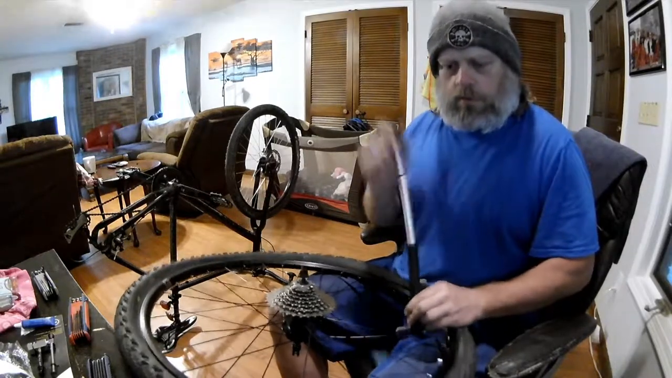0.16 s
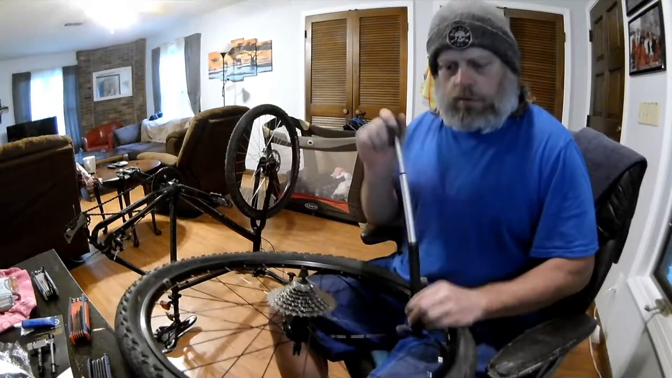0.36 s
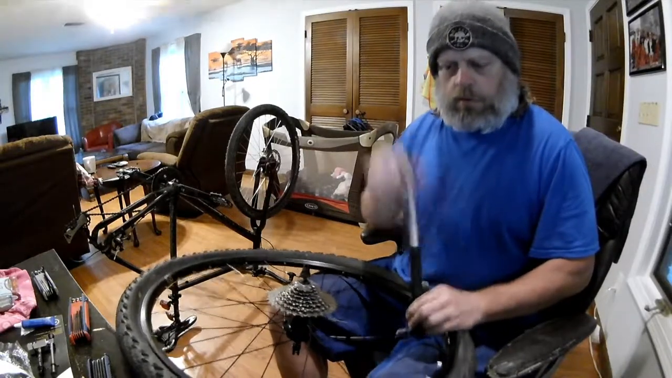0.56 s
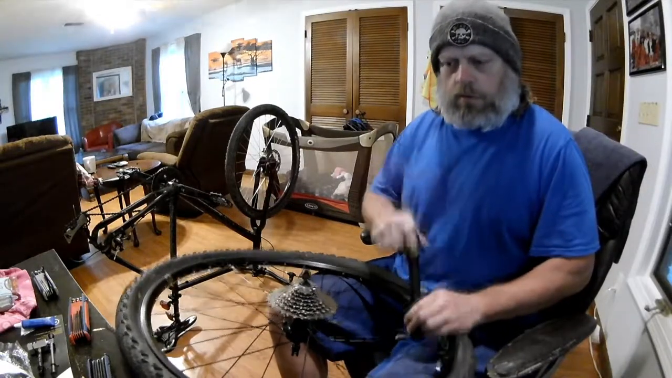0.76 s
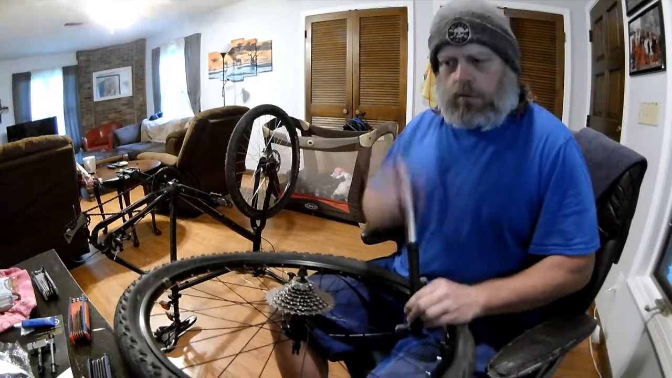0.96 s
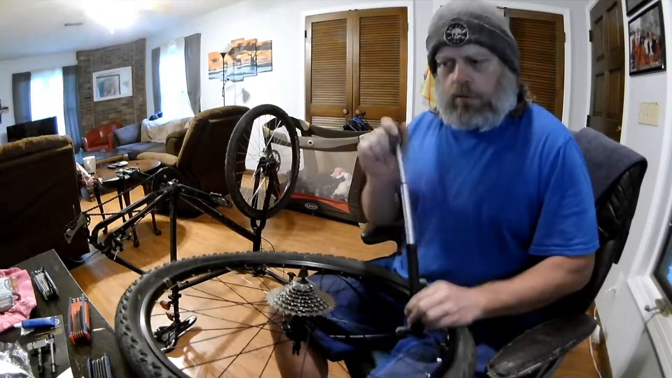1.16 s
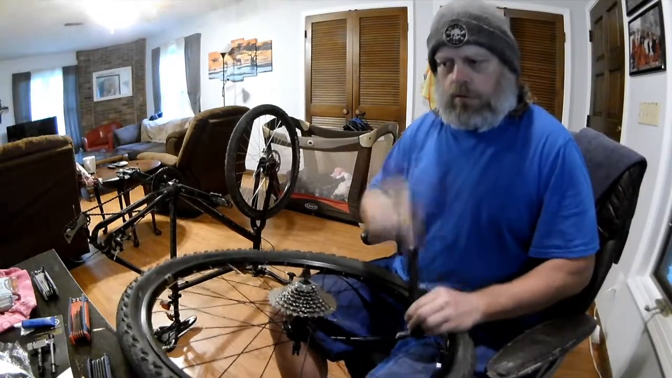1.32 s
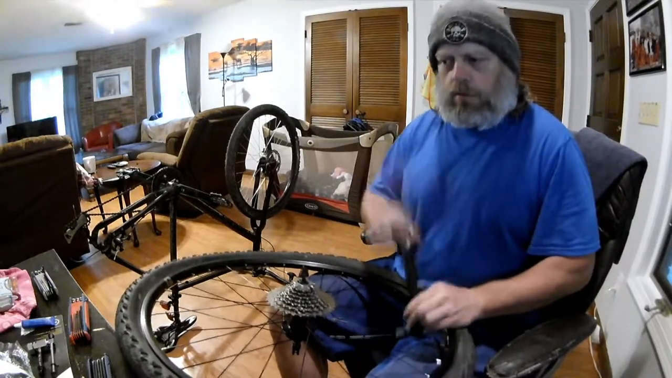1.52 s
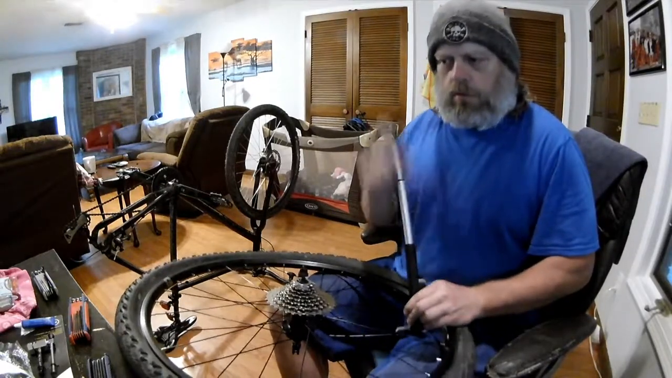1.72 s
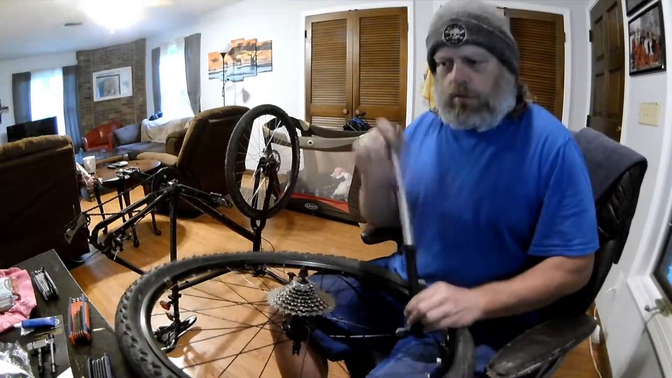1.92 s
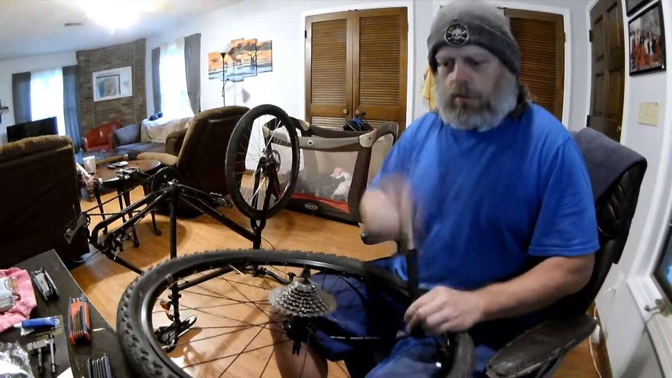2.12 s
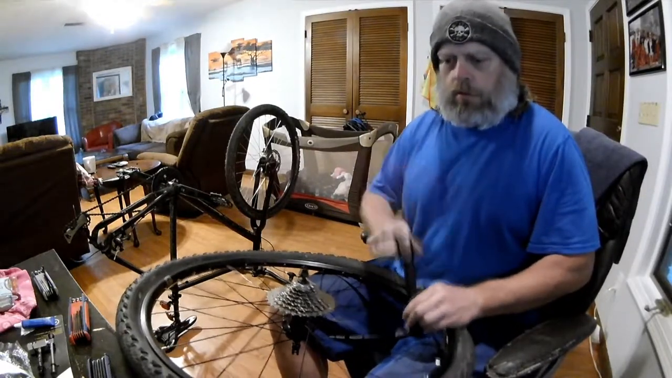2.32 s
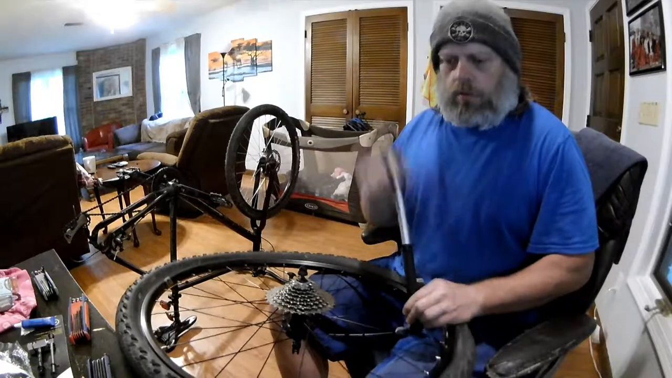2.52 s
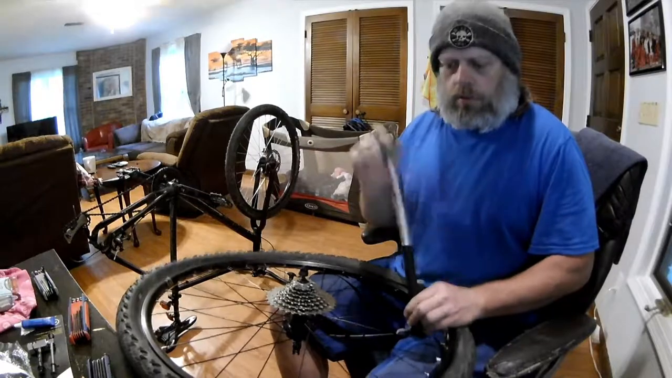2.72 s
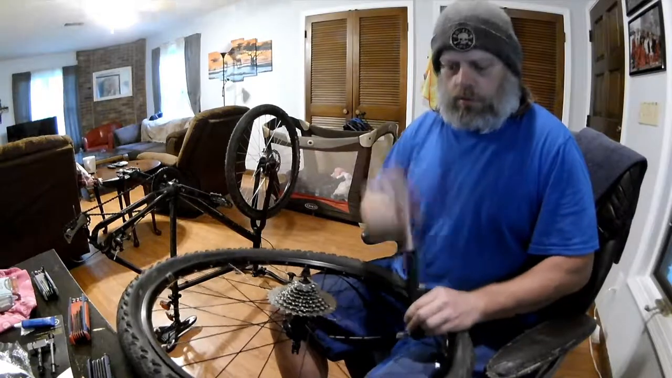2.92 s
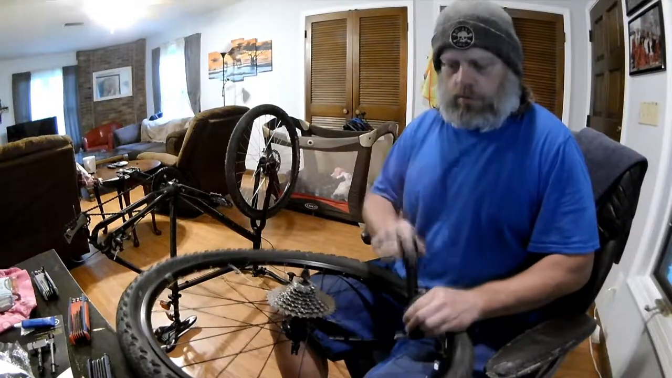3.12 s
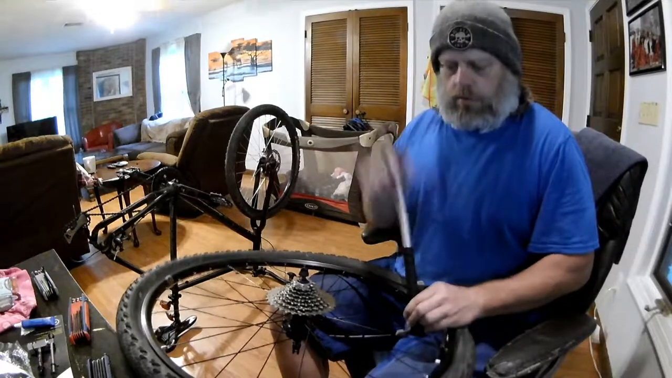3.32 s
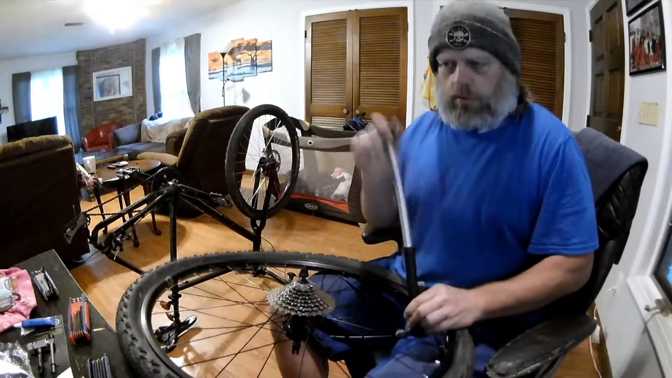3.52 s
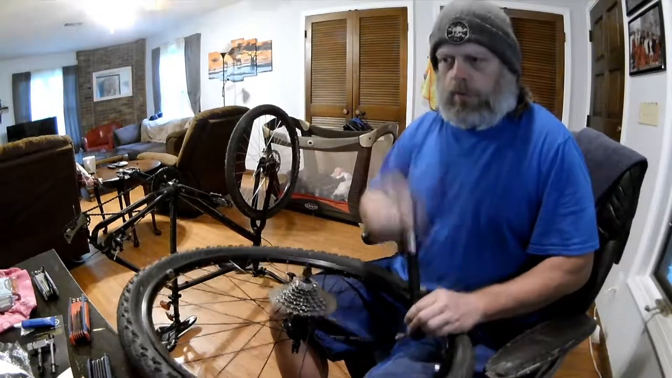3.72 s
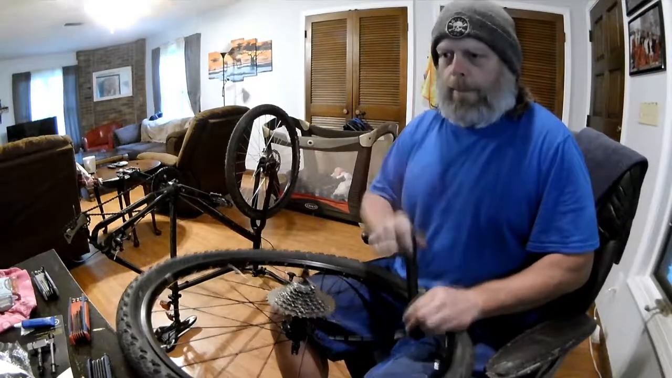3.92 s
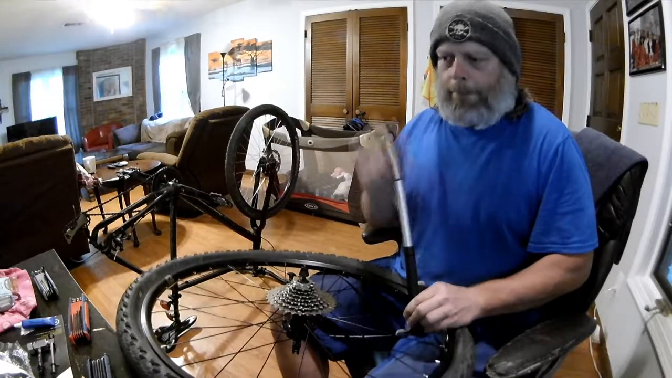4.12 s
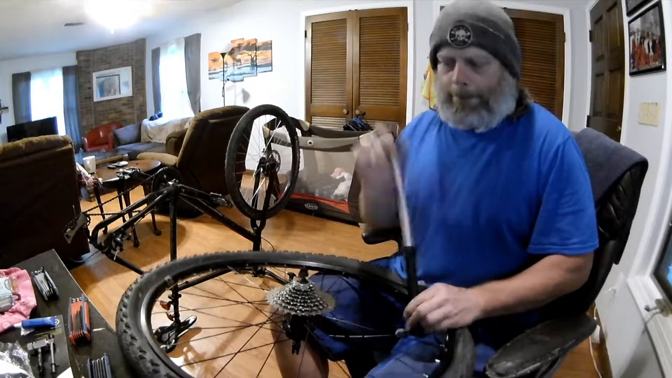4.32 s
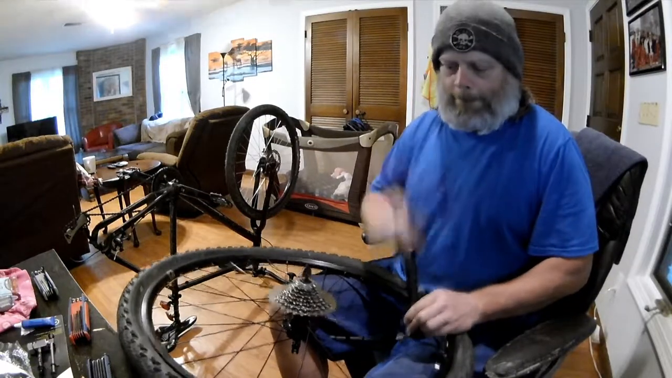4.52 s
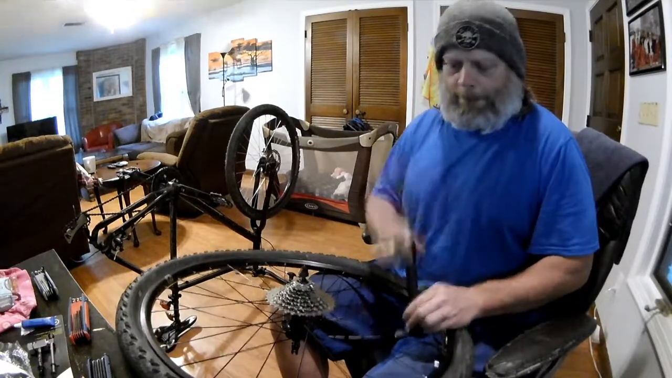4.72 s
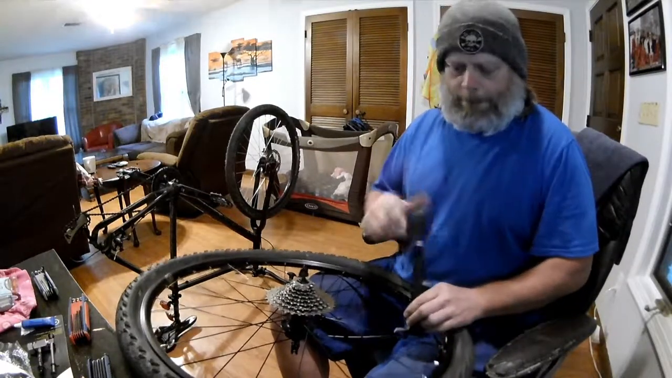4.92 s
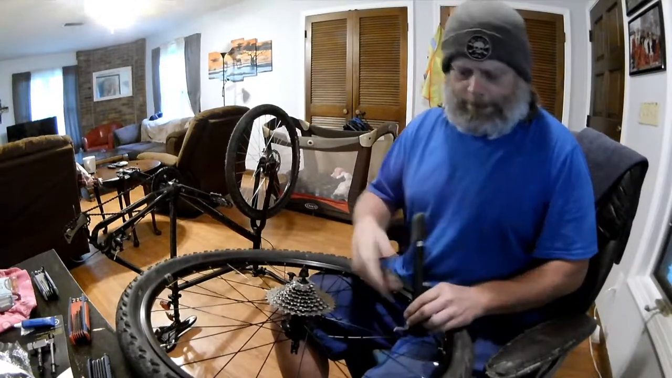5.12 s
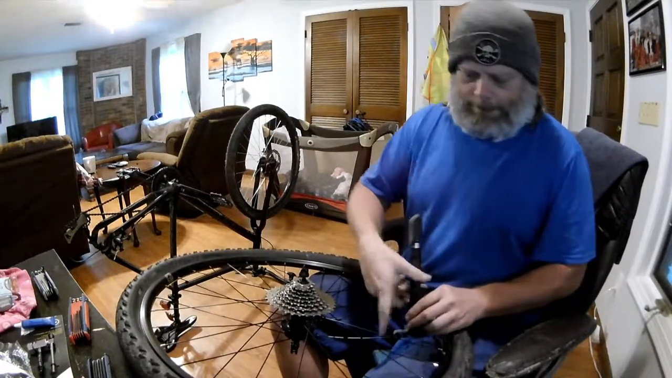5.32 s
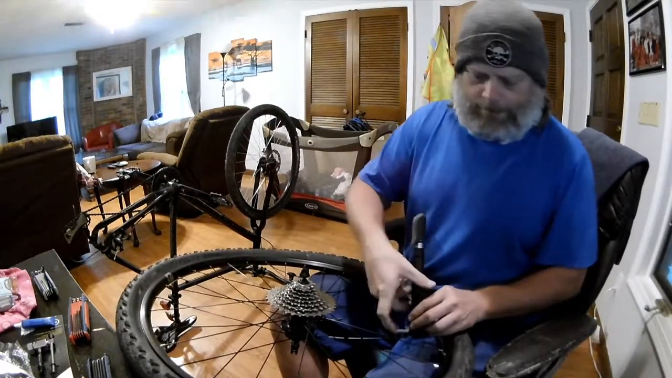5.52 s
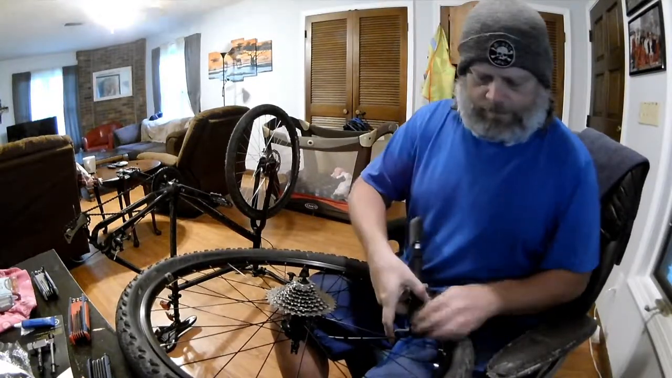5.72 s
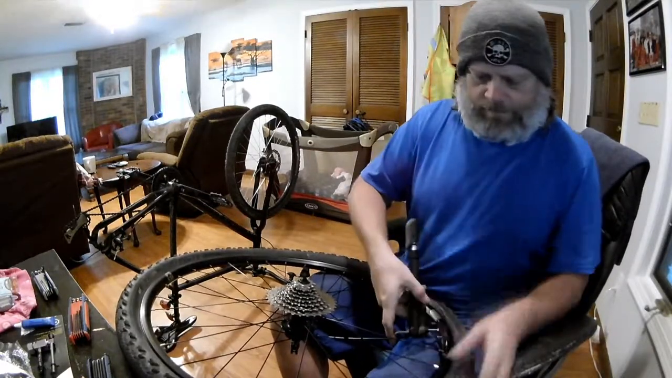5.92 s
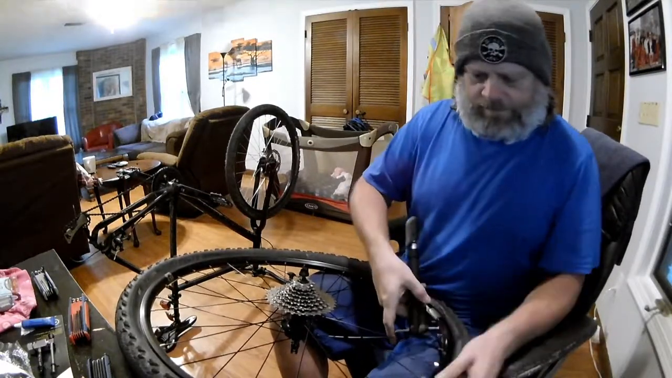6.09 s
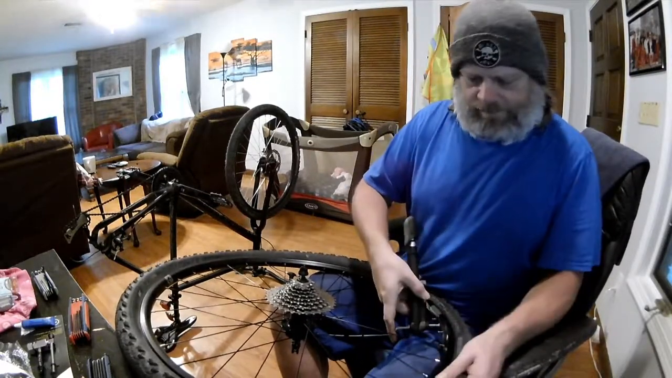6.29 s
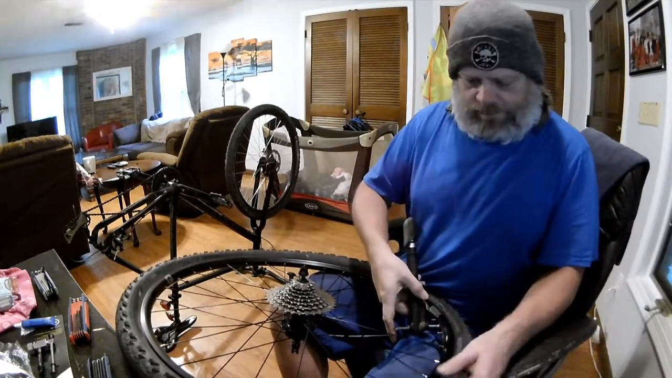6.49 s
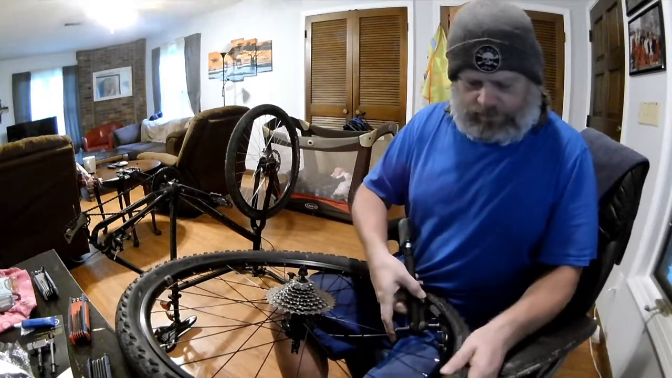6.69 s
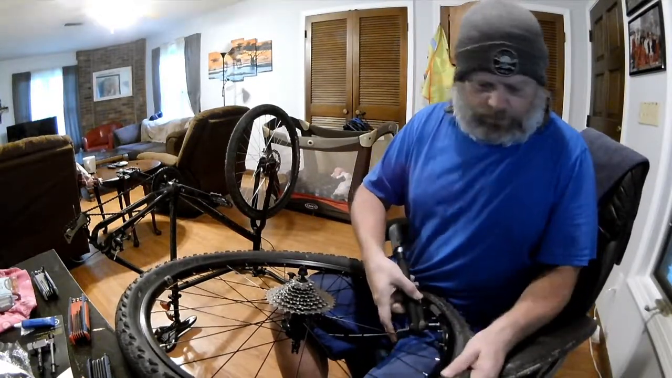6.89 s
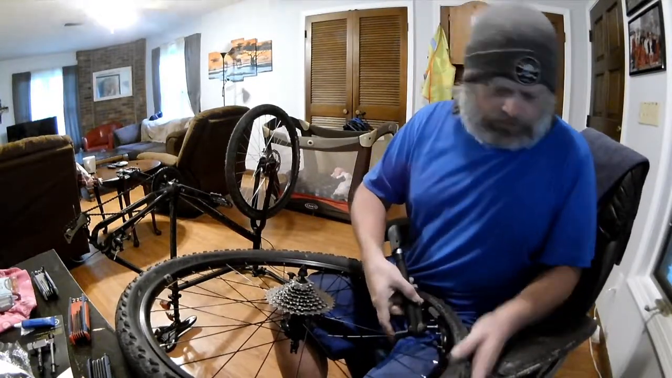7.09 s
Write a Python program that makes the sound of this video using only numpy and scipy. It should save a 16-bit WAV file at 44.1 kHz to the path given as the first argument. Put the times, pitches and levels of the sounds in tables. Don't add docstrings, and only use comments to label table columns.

```python
import sys
import numpy as np
from scipy import signal
from scipy.fft import rfft, irfft
from scipy.io import wavfile

SR = 44100
rng = np.random.default_rng(int(sys.argv[2]) if len(sys.argv) > 2 else 0)


def gain_from_db(level_db):
    decades = np.asarray(level_db, float) / 20
    return 10 ** decades


def master(y):
    cut = np.clip(np.atleast_2d(y).T, -1, 1)
    pcm = np.round(cut * 32767)
    wavfile.write(sys.argv[1], SR, pcm.astype(np.int16))


N = 315315
SIZE = 4096

# start in seconds, peak in dB, lean of the pump (0 upright, 1 tilted),
# brightness in dB per octave, level of the valve whistle in dB.
KNOCKS = [(0.1811, -6.5, 0.054, -0.3, -50), (0.4433, -6, 0.086, -0.2, -46), (0.7088, -5.5, 0.13, 0.8, -56),
          (0.977, -6, 0.27, -0.2, -47), (1.261, -10, 0.98, 1, -63), (1.5261, -11, 0.83, 0.4, -65),
          (1.7646, -5.5, 0.13, 0.4, -42), (2.0514, -10.5, 0.98, 1, -65), (2.3187, -12, 1, 1.5, -65),
          (2.589, -11.5, 1, 2, -65), (2.8525, -11.5, 1, 0.7, -65), (3.1141, -10, 0.98, 0.5, -65),
          (3.379, -10, 0.9, 0, -63), (3.6319, -6, 0.12, 0.1, -37), (3.892, -6.5, 0.41, 0.7, -42),
          (4.1645, -6, 0.07, 0.7, -40), (4.4416, -8.5, 1, 0.1, -43), (4.7212, -10, 1, 1.5, -43)]
EARLIER_KNOCK = (-.08, -4, .1, .1, -65)
# frequency in Hz, level in dB.
MICROPHONE = [(20, 0), (1500, 2), (1980, 0.5), (2300, -2.5), (2600, -11.5), (3300, -21.5), (4000, -22),
              (7000, -25.5), (7900, -43), (8800, -28), (9500, -29), (10500, -26.5), (13000, -29),
              (15500, -34)]


def piston_knocks(tails):
    # frequency in Hz, level in dB per Hz.
    knock_spectrum = [(150, -27), (300, -15), (600, -7.5), (1000, -9.5), (1700, -1), (2500, -3.5),
                      (3300, -12), (4200, -26.5), (7000, -50), (14000, -55)]
    room_upright_db, room_tilted_db = -4.5, -2
    rows = []
    for s, peak_db, lean, tilt_db, _ in [EARLIER_KNOCK, *KNOCKS]:
        room_db = room_upright_db + lean * (room_tilted_db - room_upright_db)
        chuff_db = -42 + 0.53 * peak_db
        rows.append((s, peak_db, lean, tilt_db, room_db, chuff_db))
    return blows(rows, knock_spectrum, tails, echo_db=1.1, tail_db=-32.5, chuff_t60=0.028, ring_db=-11.5)


def blows(rows, spectrum, tails, echo_db, tail_db, chuff_t60, ring_db=-60):
    # first delay in seconds, level in dB, echoes in its flutter.
    upright = [(.00102, -3.5, 1), (.00204, -11, 1), (.00342, -6.5, 4), (.00807, -12, 1), (.00857, -7.5, 3),
               (.01215, -12, 2), (.01884, -11, 1), (.0244, -15, 1), (.02753, -11, 1)]
    # first delay in seconds, level in dB, echoes in its flutter.
    tilted = [(.0027, -5, 1), (.00408, -7, 1), (.00553, -5, 2), (.00698, -8.5, 3), (.00993, -3.5, 3),
              (.0139, -11, 1), (.01542, -13, 2), (.0204, -15, 1), (.02835, -10, 2)]
    # frequency in Hz, level in dB.
    surface_colour = [(300, -1), (800, -10), (1120, 1), (1500, -7), (2030, 2.5), (2350, -8), (4000, -7.5)]
    out = np.zeros(N)
    for s, peak_db, lean, tilt_db, room_db, chuff_db in rows:
        lean = np.clip(lean, 0, 1)
        turn = lean * np.pi / 2
        room = np.cos(turn) * tails[0] + np.sin(turn) * tails[1]
        path = gain_from_db(tail_db + room_db) * room
        path[0] += .88
        add(out, s, chuff(chuff_db, chuff_t60, room_db))
        echoes = reflections(upright, 1 - lean) + reflections(tilted, lean)
        path[:SIZE] += gain_from_db(echo_db) * signal.fftconvolve(echoes, causal(surface_colour))[:SIZE]
        path += gain_from_db(ring_db + room_db) * barrel_ring(lean)
        blow = signal.fftconvolve(pulse(spectrum, peak_db, tilt_db), path)
        add(out, s - .00037, blow)
    return out


def pulse(spectrum, peak_db, tilt_db):
    smear_hz, smear_width_hz = 1000, 1400
    radius = np.exp(-np.pi * smear_width_hz / SR)
    poles = [1, -2 * radius * np.cos(2 * np.pi * smear_hz / SR), radius * radius]
    shape = signal.lfilter(poles[::-1], poles, causal(spectrum, tilt_db))
    heard = signal.fftconvolve(shape, causal(MICROPHONE))
    return gain_from_db(peak_db) * shape / np.abs(heard).max()


def reflections(surfaces, gain):
    flutter_s, flutter_loss_db = .00103, 4.1
    echoes = []
    for s, db, count in surfaces:
        for k in range(int(count)):
            echoes.append((s + k * flutter_s, db - k * flutter_loss_db))
    clicks = np.zeros(SIZE)
    luck = rng.standard_normal((len(echoes), 2))
    for (s, db), (shift, change) in zip(echoes, luck):
        clicks[round((s + .00002 * shift) * SR)] += gain * gain_from_db(db + 1.5 * change)
    return clicks


def barrel_ring(lean):
    # frequency in Hz, level in dB, t60 in seconds.
    barrel_modes = [(1107, -34.5, 0.25), (1950, -36.5, 0.29), (2037, -38, 0.38), (2140, -39, 0.35)]
    t = np.arange(SR // 2) / SR
    ring = np.zeros(len(t))
    for (hz, db, t60), (luck, turn) in zip(barrel_modes, rng.random((len(barrel_modes), 2))):
        tilt_db = 3.1 * lean * np.log2(hz / 2000)
        level_db = db + 1.5 * (luck - 0.5) + tilt_db - 60 * t / t60
        ring += gain_from_db(level_db) * np.sin(2 * np.pi * (hz * t + turn))
    return ring * (1 - np.exp(-t / 0.0016))


def chuff(peak_db, t60, room_db):
    # frequency in Hz, level in dB.
    chuff_spectrum = [(1500, -19), (3000, 0.5), (3900, -1.5), (4800, 3.5), (5600, 0), (6700, -0.5),
                      (9000, -4), (9500, 2.5), (10200, -6), (15000, -10)]
    t = np.arange(SR // 2) / SR
    direct = gain_from_db(-60 * t / t60) * (1 - np.exp(-t / 0.00063))
    wash = gain_from_db(-14.5 + room_db - 60 * t / 0.41) * (1 - np.exp(-(t / 0.012) ** 2))
    burst = rng.standard_normal(len(t)) * (direct + wash)
    return gain_from_db(peak_db + 30) * signal.fftconvolve(burst, causal(chuff_spectrum))


def rattles(tails):
    # start in seconds, peak in dB, brightness in dB per octave, chuff level in dB.
    rattle_events = [(0.3602, -14.5, -1, -38), (0.376, -24, 10.5, -47.5), (0.404, -33, 6, -54.5),
                     (2.352, -15.5, 3.5, -46), (2.6237, -17.5, 4, -48), (2.8849, -19.5, -0.5, -46.5),
                     (3.1577, -23.5, 0.5, -56.5), (3.5641, -20.5, 1.5, -50.5), (4.499, -20.5, 5, -49.5),
                     (4.744, -17, 2, -41), (4.771, -20, 7, -54)]
    # frequency in Hz, level in dB per Hz.
    rattle_spectrum = [(110, -28), (400, -7), (950, -5), (1500, -8.5), (2100, -13), (3000, -28),
                       (4200, -26.5), (14000, -52)]
    lean, room_db = .7, -4.5
    rows = [(s, db, lean, tilt_db, room_db, chuff_db) for s, db, tilt_db, chuff_db in rattle_events]
    return blows(rows, rattle_spectrum, tails, echo_db=-5.0, tail_db=-32.5, chuff_t60=0.029, ring_db=-15)


def bumps(tails):
    # start in seconds, peak in dB, ring in Hz, room level in dB.
    bump_events = [(1.208, -36.5, 1400, 4), (2.269, -35, 1000, -5), (2.534, -39, 900, 4),
                   (2.803, -28, 1150, -14), (3.069, -28, 1270, -7.5), (4.681, -22, 1220, -12),
                   (4.749, -15, 832, -17.5), (5.151, -47.5, 3080, 4.5), (5.165, -53, 3250, -11),
                   (6.0508, -29, 1540, -1), (6.051, -51, 3150, -6), (6.075, -37, 1500, -4),
                   (6.099, -52, 1200, -4)]
    # multiple of the ring frequency, level in dB per Hz.
    bump_shape = [(.12, -19), (.65, -9), (1, -2), (1.3, -11.5), (3.1, -26)]
    out = np.zeros(N)
    for s, db, hz, room_db in bump_events:
        spectrum = [(k * hz, level) for k, level in bump_shape]
        tilt_db = 7 * np.log2(max(hz / 1500, 1))
        row = (s, db, .4, tilt_db, room_db, -74)
        out += blows([row], spectrum, tails, echo_db=-7.5, tail_db=-27.0, chuff_t60=0.021)
    return out


def ticks(tails):
    # start in seconds, peak in dB.
    tick_events = [(0.074, -51), (0.5995, -56), (0.8195, -48), (1.0815, -46), (1.3538, -47.5),
                   (1.6541, -59), (1.8826, -46), (1.919, -52), (2.149, -48), (4.049, -48), (4.2827, -51),
                   (6.053, -47), (6.079, -59)]
    # frequency in Hz, level in dB per Hz.
    tick_spectrum = [(1000, -26), (3000, 3.5), (6100, 11.5), (10000, -6), (14000, -1)]
    rows = [(s, db, .6, 0, 0, db - 12.5) for s, db in tick_events]
    return blows(rows, tick_spectrum, tails, echo_db=-13, tail_db=-36.0, chuff_t60=0.026)


def thumps(tails):
    # start in seconds, peak in dB, place of the push (-1 tyre to 1 rim).
    thump_events = [(0.364, -33, -0.46), (0.372, -32.5, -1.2), (0.793, -40, -0.015), (1.055, -37.5, 0.13),
                    (1.317, -33, -0.0048), (1.584, -37, -0.14), (1.852, -40, -0.6), (2.11, -37, .4),
                    (2.368, -36, .3), (2.538, -44, 0.8), (2.641, -36.5, 0.37), (2.9, -38, 0.51),
                    (3.167, -37, 0.76), (3.437, -33.5, -0.02), (3.978, -36, -0.0077), (4.25, -33.5, -0.23),
                    (4.515, -37, 0.52), (4.675, -36.5, -0.95), (4.747, -36, -0.71)]
    # frequency in Hz, t60 in seconds.
    wheel_modes = [(128, 0.044), (215, 0.043), (345, 0.067)]
    out = np.zeros(N)
    t = np.arange(SIZE) / SR
    for s, peak_db, place in thump_events:
        note = np.zeros(SIZE)
        for (hz, t60), mode_place in zip(wheel_modes, (-1, 0, 1)):
            db = -8 * (mode_place - place) ** 2
            note += gain_from_db(db - 60 * t / t60) * np.sin(2 * np.pi * hz * t)
        note *= 1 - np.exp(-t / 0.003)
        room = gain_from_db(-34.5) * signal.fftconvolve(note, tails[0])[:SIZE]
        add(out, s, gain_from_db(peak_db + 8.5) * (note + room))
    return out


def whistle():
    # frequency in Hz, level in dB per Hz.
    whistle_spectrum = [(8600, -30), (9300, -7), (9550, 6), (9850, -5), (11000, -16.5), (13500, -23.5)]
    lag_s, rise_s, fall_s = .016, .035, .018
    t, strength = np.arange(N) / SR, np.zeros(N)
    for knock_s, *_, db in KNOCKS:
        since = t - knock_s - lag_s
        width_s = np.where(since < 0, rise_s, fall_s)
        strength += gain_from_db(db - 29) * np.exp(-(since / width_s) ** 2)
    return noise(whistle_spectrum) * strength


def air():
    # time after the knock in seconds, width in seconds, level in dB.
    puffs = [
        (0, 0.027, -71),
        (.15, 0.071, -76.5),
        (.25, .03, -80),
    ]
    # frequency in Hz, level in dB per Hz.
    hiss_spectrum = [(1500, -34), (3000, -2), (6000, -2), (11000, -3), (15000, -8.5)]
    # time in seconds, level in dB.
    effort = [(0, 1.5), (1.0, 2), (3.0, 0), (3.5, -0.5), (4.8, -2.5)]
    t = np.arange(N) / SR
    starts = np.array([EARLIER_KNOCK, *KNOCKS])[:, 0]
    since = t - starts[np.searchsorted(starts, t) - 1]
    flow = gain_from_db(-88.5)
    for s, width_s, db in puffs:
        flow = flow + gain_from_db(db) * np.exp(-((since - s) / width_s) ** 2)
    flutter_db = 4 * np.interp(t * 30, np.arange(400), rng.standard_normal(400))
    fade_db = -300 * np.maximum(t - starts[-1] - .06, 0)
    effort_db = np.interp(t, *np.transpose(effort))
    return noise(hiss_spectrum) * flow * gain_from_db(effort_db + fade_db + flutter_db - 10.5)


def reverberation():
    # frequency in Hz, t60 in seconds.
    room_t60 = [(150, 1), (500, 0.5), (1000, 0.68), (1600, 0.24), (2050, 0.5665), (2600, 0.13),
                (4000, 0.51), (10000, 0.05)]
    # frequency in Hz, level in dB.
    room_colour = [(150, -2), (1000, 1), (1600, -0.5), (2050, 2), (2400, -7), (3500, 5), (10000, -5.5)]
    t = np.arange(SR // 2) / SR
    tail = np.zeros(len(t))
    for hz in 90 * 2 ** np.arange(0, 7.6, .25):
        edges_hz = [hz / 2 ** .125, hz * 2 ** .125]
        band = signal.butter(2, edges_hz, "band", fs=SR, output="sos")
        level_db = at_hz(room_colour, hz) - 60 * t / at_hz(room_t60, hz)
        tail += signal.sosfilt(band, rng.standard_normal(len(t))) * gain_from_db(level_db)
    return tail * (1 - np.exp(-(t / 0.0024) ** 2))


def house():
    # frequency in Hz, level in dB per Hz.
    house_spectrum = [(25, -75), (45, -78.5), (68, -69.5), (95, -81.5), (120, -68.5), (160, -78),
                      (220, -74.5), (310, -79), (500, -77.5), (1250, -81), (1600, -88.5), (2200, -91),
                      (4000, -86.5), (15000, -92.5)]
    return noise(house_spectrum)


def noise(spectrum):
    white = rng.standard_normal(N + SIZE)
    return signal.fftconvolve(white, causal(spectrum), "valid")[:N] * np.sqrt(SR / 2)


def causal(spectrum, tilt_db=0.):
    hz = np.maximum(np.fft.rfftfreq(SIZE, 1 / SR), 10)
    level_db = at_hz(spectrum, hz) + tilt_db * np.log2(hz / 2000)
    cepstrum = irfft(np.log(gain_from_db(level_db)))
    cepstrum[1:SIZE // 2] *= 2
    cepstrum[SIZE // 2 + 1:] = 0
    return irfft(np.exp(rfft(cepstrum)))


def at_hz(points, hz):
    points_hz, values = np.transpose(points)
    return np.interp(np.log(hz), np.log(points_hz), values)


def add(track, s, sound):
    i = round(s * SR)
    part = sound[max(-i, 0):N - i]
    track[max(i, 0):max(i, 0) + len(part)] += part


def scene():
    tails = reverberation(), reverberation()
    pump = piston_knocks(tails) + rattles(tails) + bumps(tails) + ticks(tails)
    mix = pump + thumps(tails) + whistle() + air() + house()
    return mix[None]


def band_limit(x):
    return signal.sosfilt(signal.butter(12, 15830, fs=SR, output="sos"), x)


def record(dry):
    # frequency in Hz, level in dB per Hz.
    preamp_hiss = [(1000, -118), (5000, -120), (15000, -122)]
    picked_up = signal.fftconvolve(dry, causal(MICROPHONE)[None])[:, :N]
    return band_limit(picked_up + noise(preamp_hiss))


dry = scene()
out = record(dry)
master(out)
```